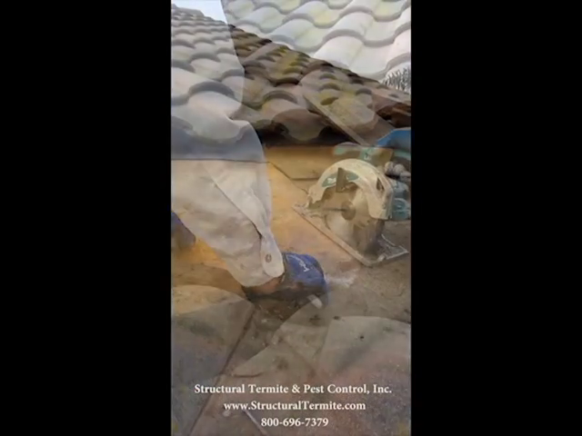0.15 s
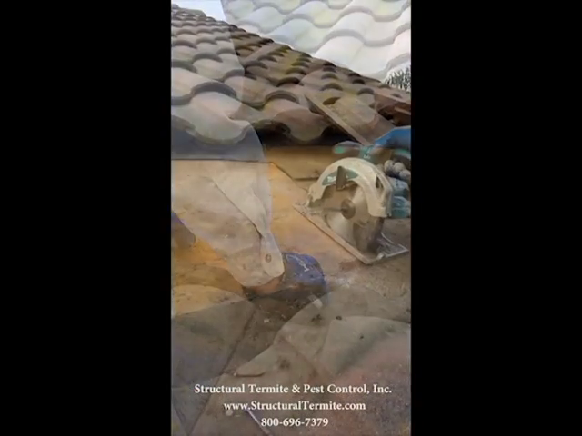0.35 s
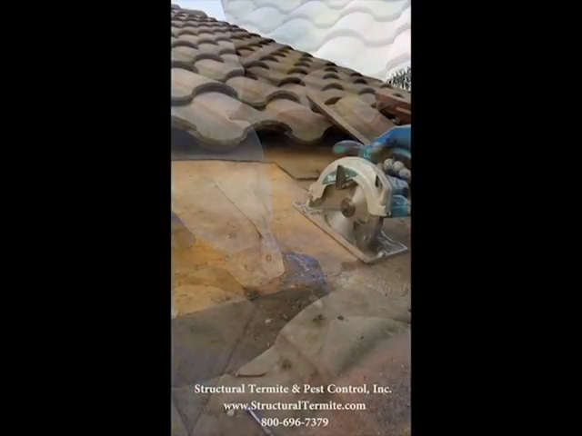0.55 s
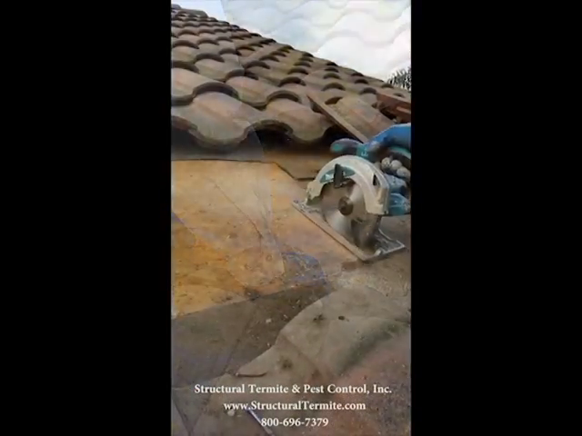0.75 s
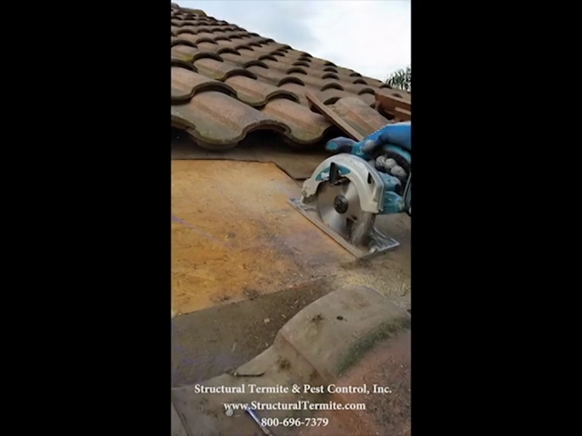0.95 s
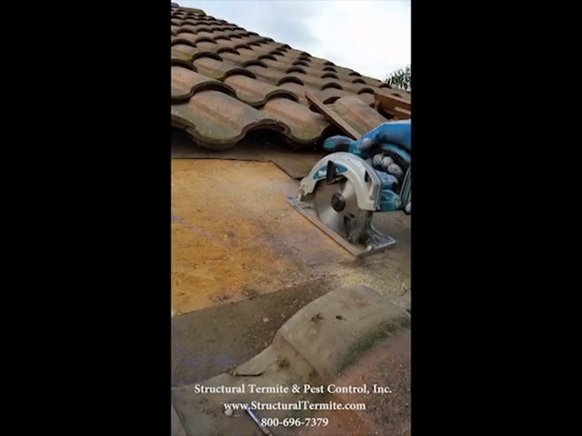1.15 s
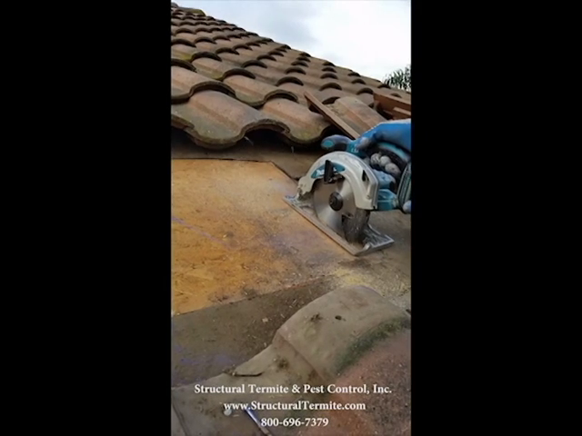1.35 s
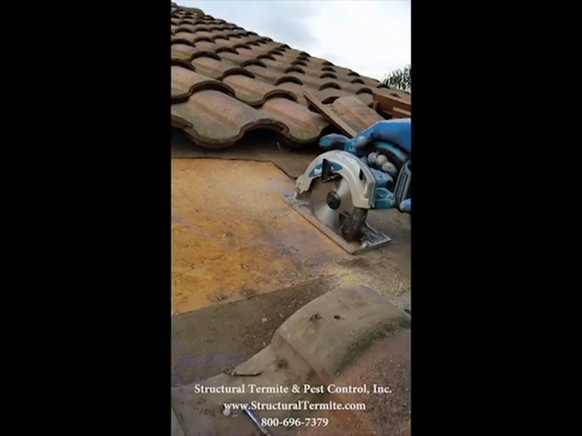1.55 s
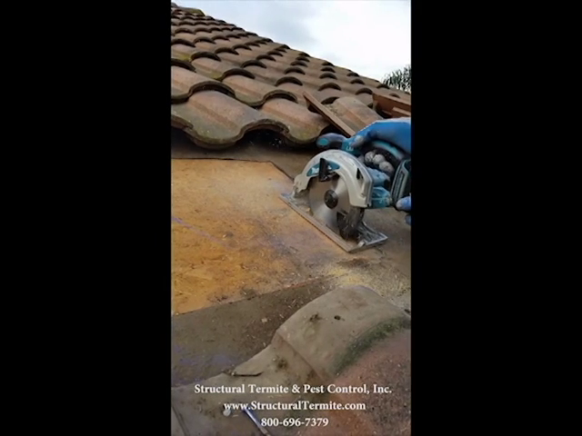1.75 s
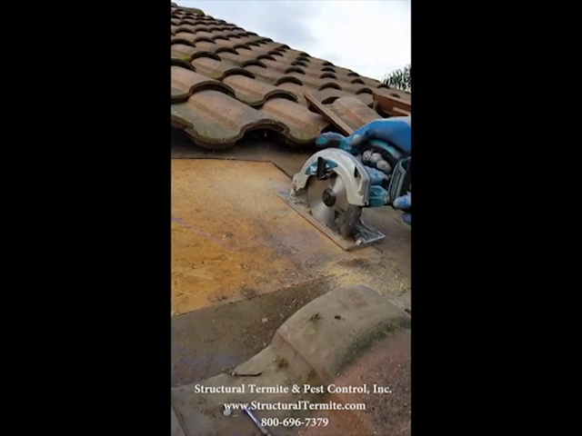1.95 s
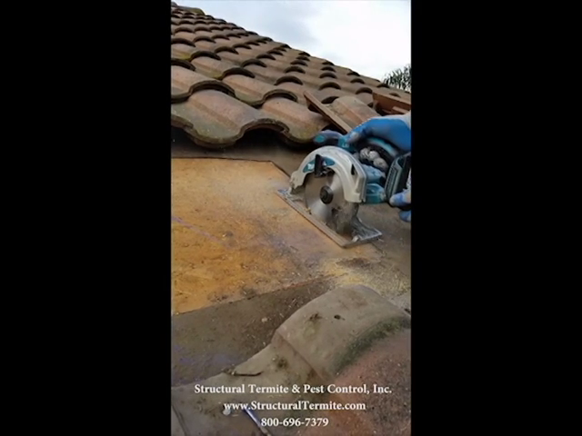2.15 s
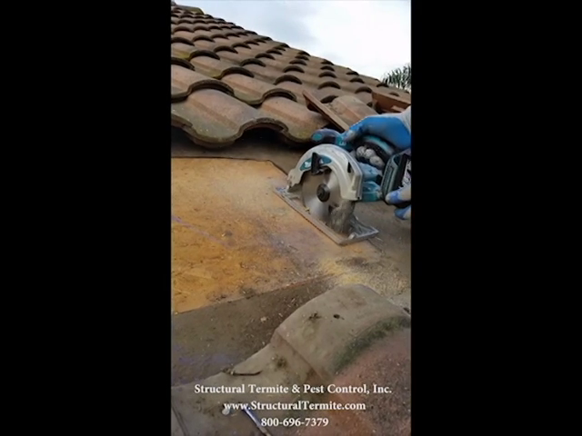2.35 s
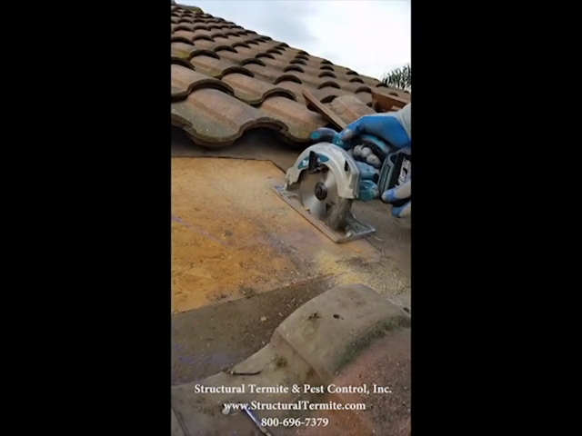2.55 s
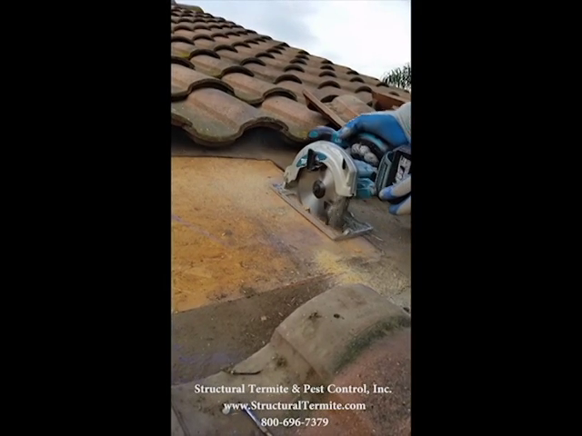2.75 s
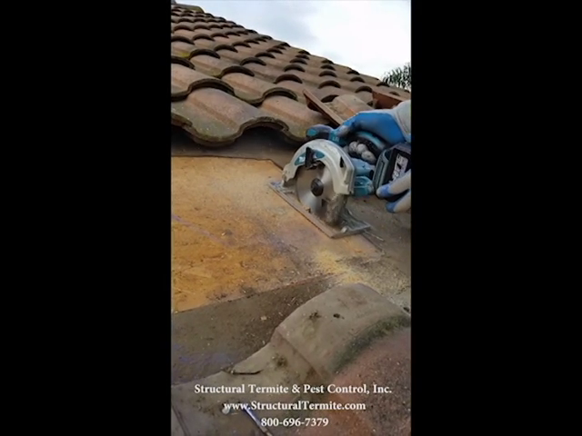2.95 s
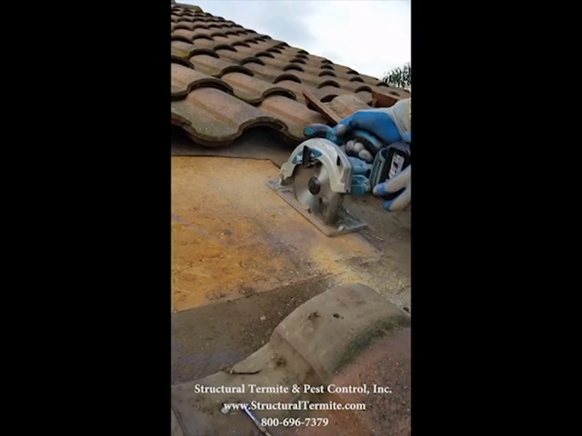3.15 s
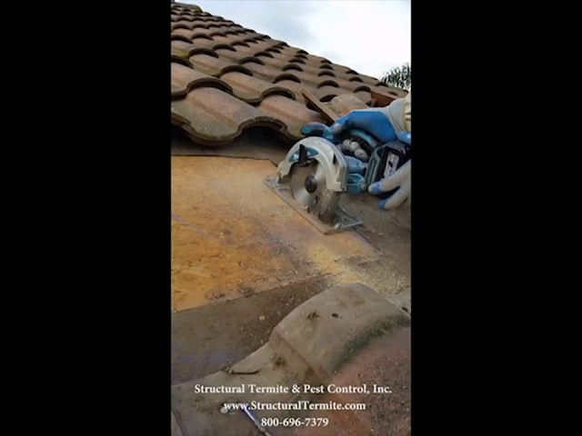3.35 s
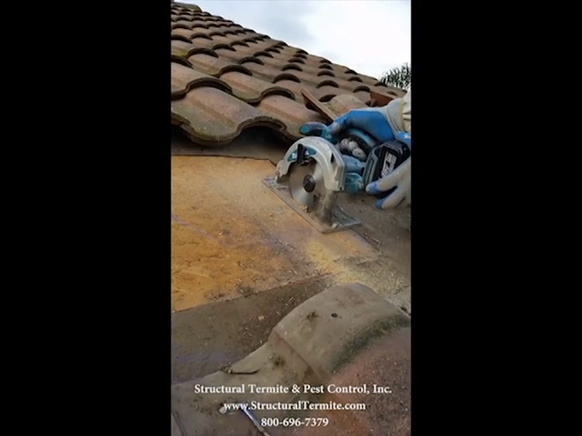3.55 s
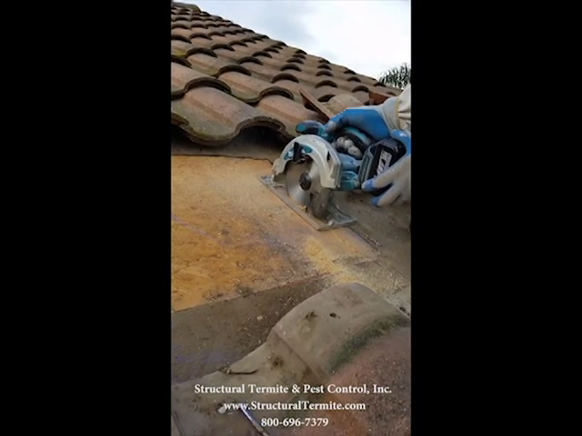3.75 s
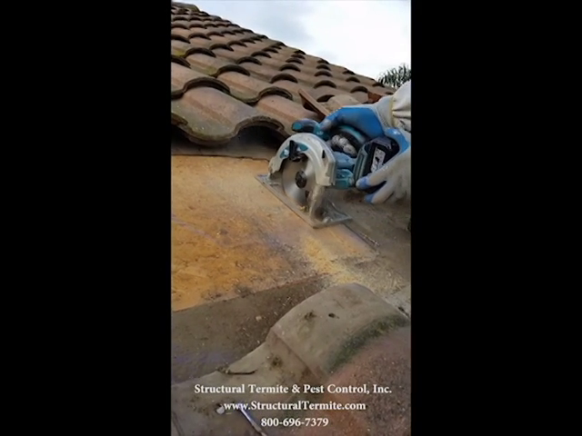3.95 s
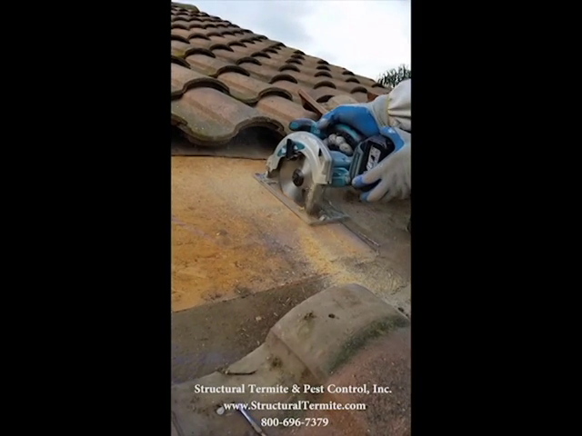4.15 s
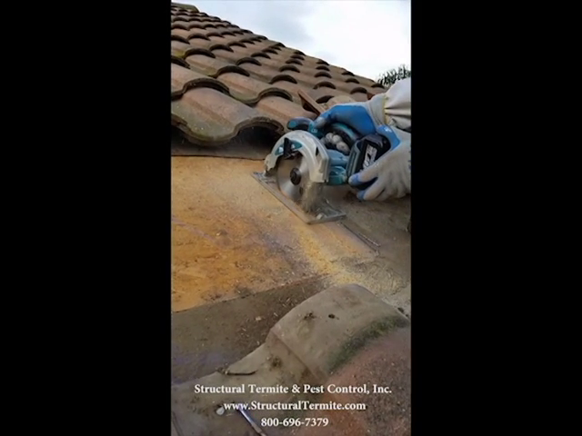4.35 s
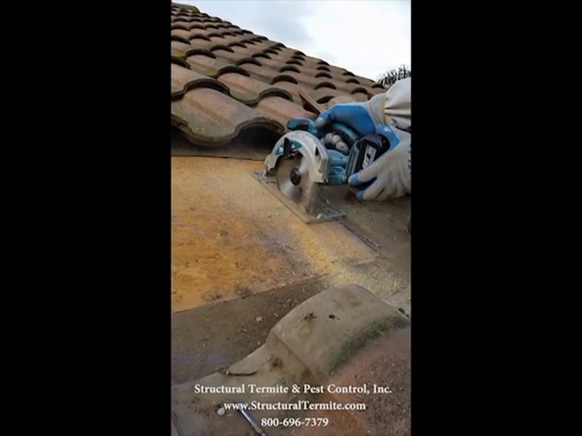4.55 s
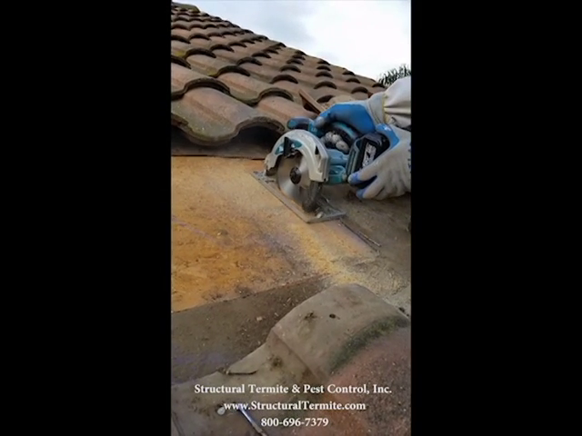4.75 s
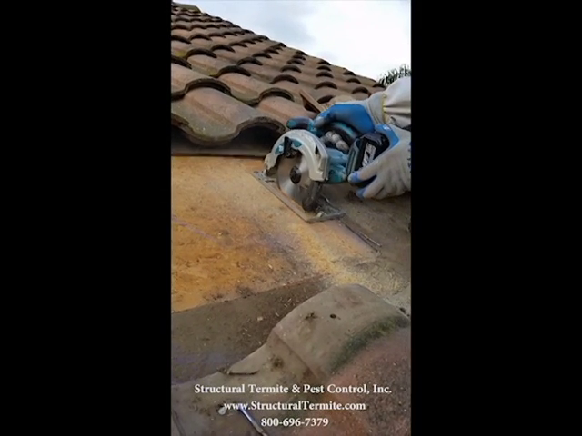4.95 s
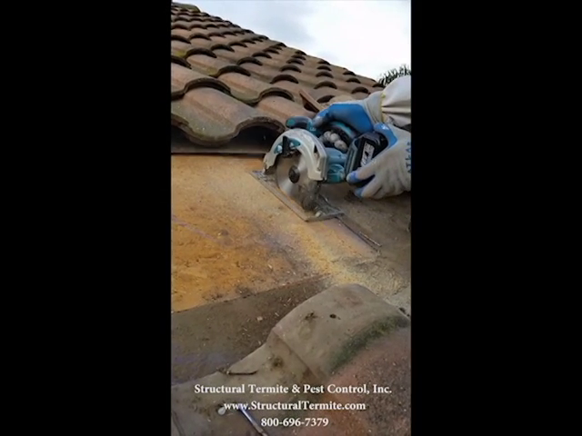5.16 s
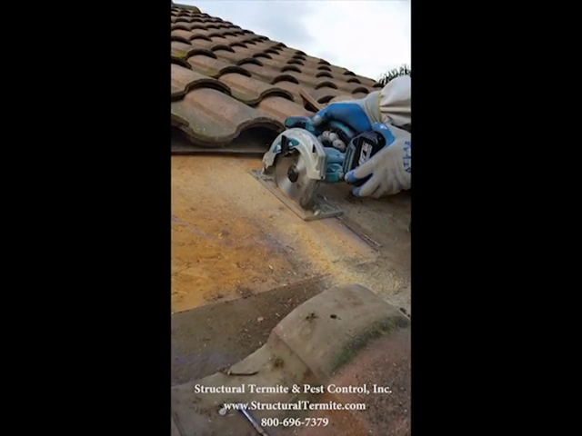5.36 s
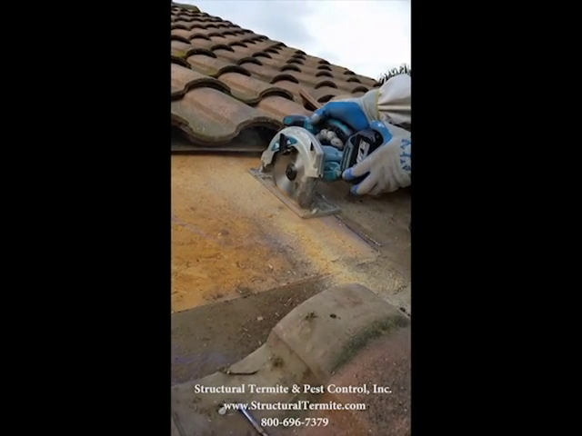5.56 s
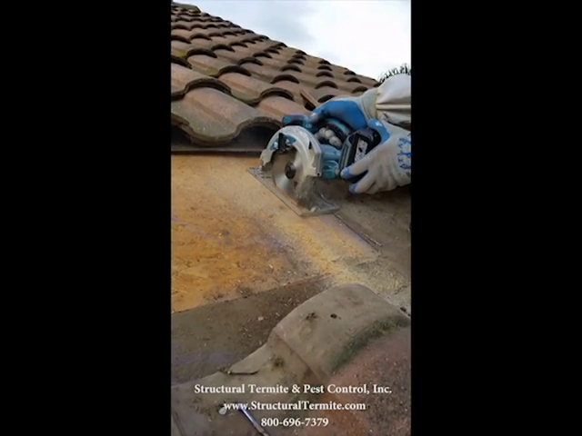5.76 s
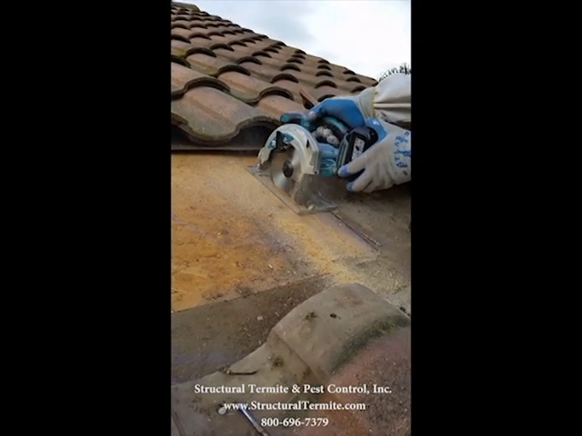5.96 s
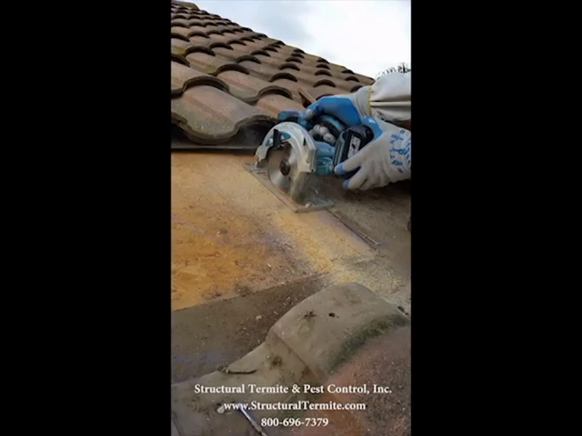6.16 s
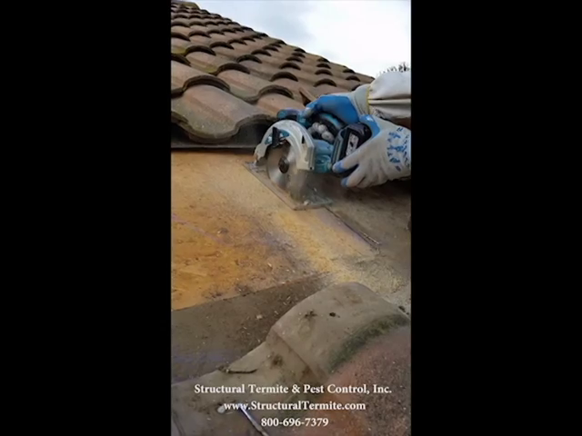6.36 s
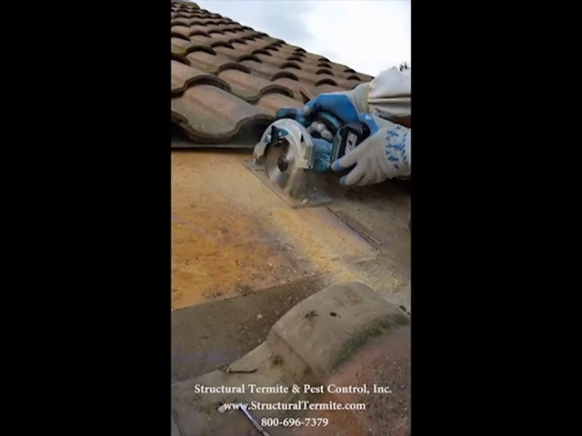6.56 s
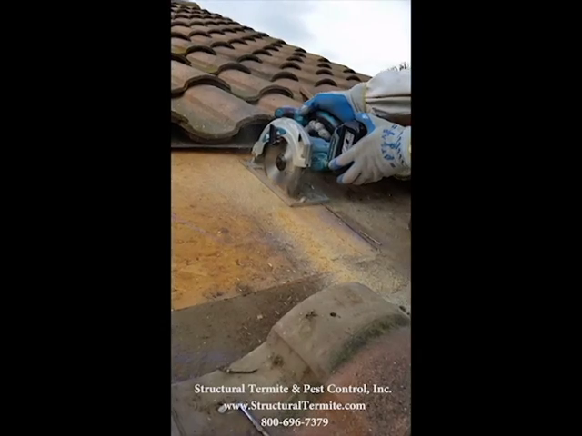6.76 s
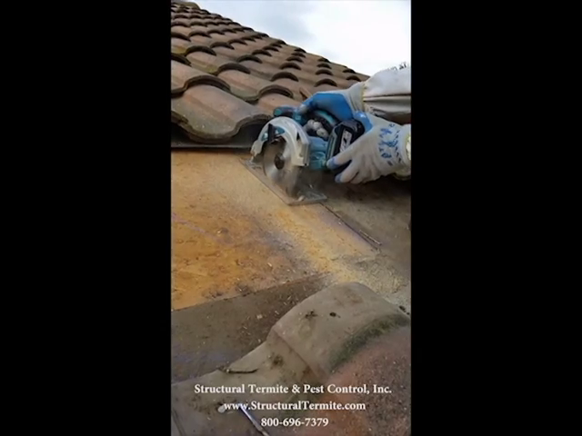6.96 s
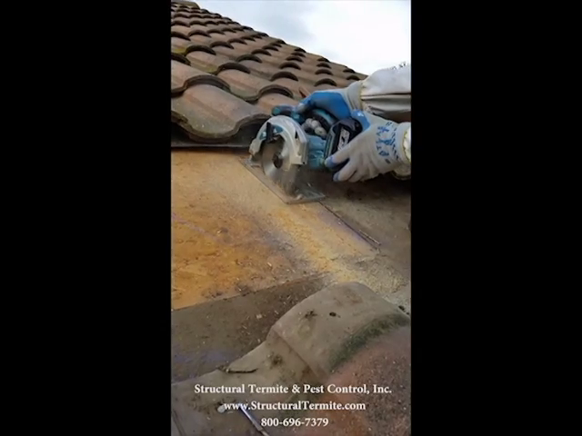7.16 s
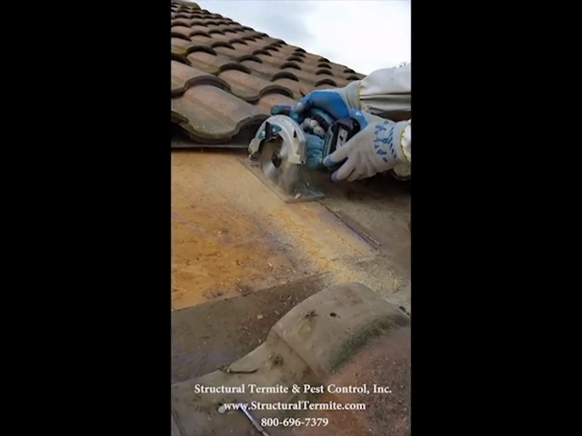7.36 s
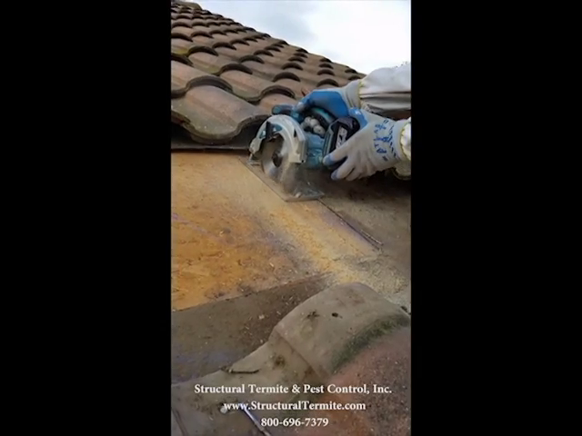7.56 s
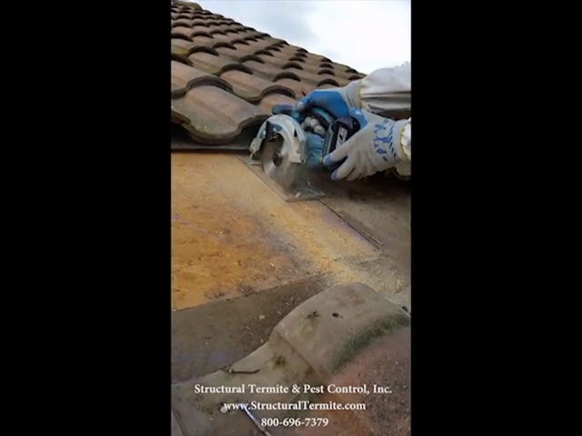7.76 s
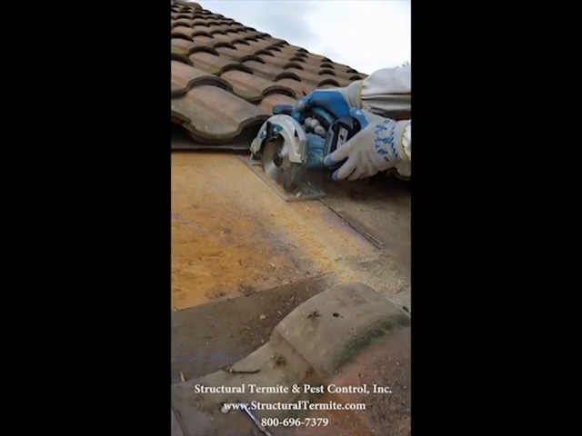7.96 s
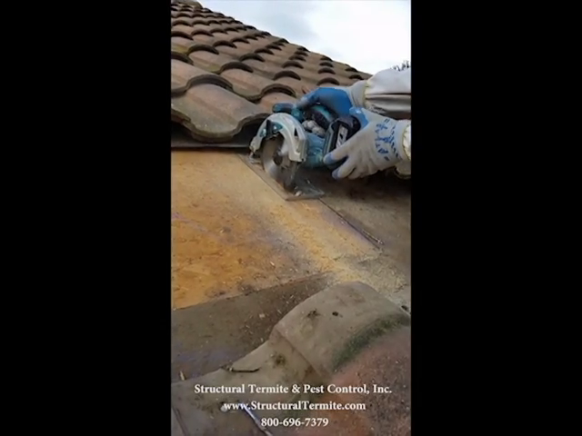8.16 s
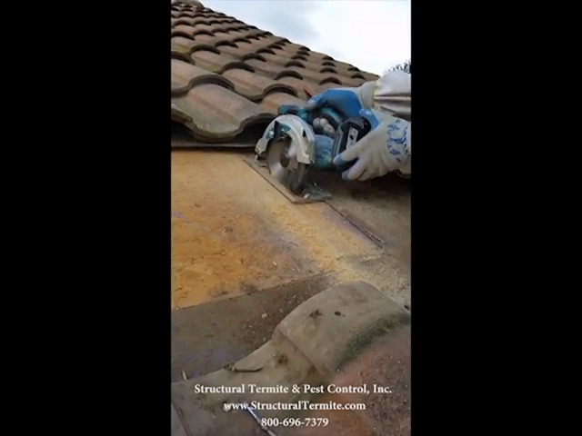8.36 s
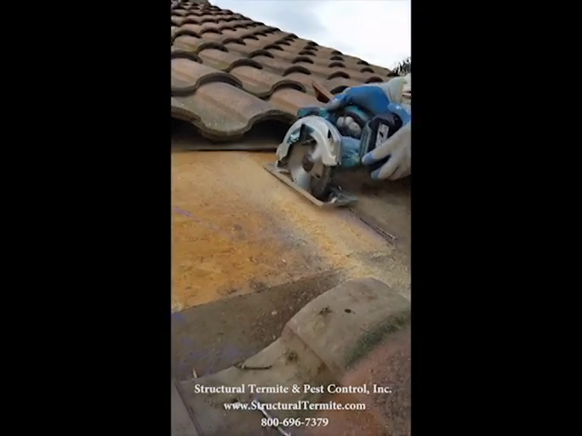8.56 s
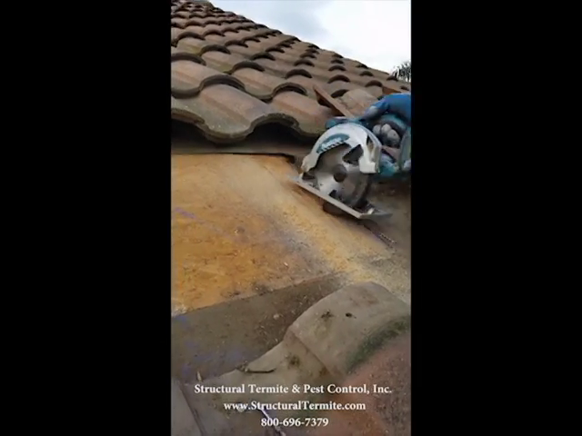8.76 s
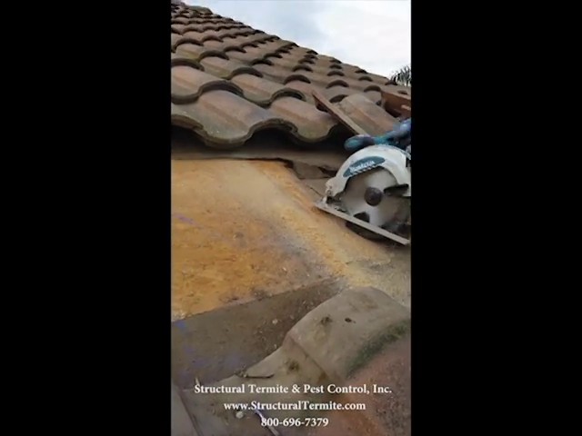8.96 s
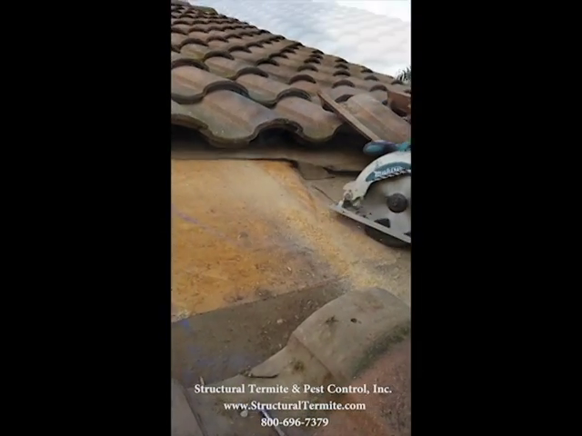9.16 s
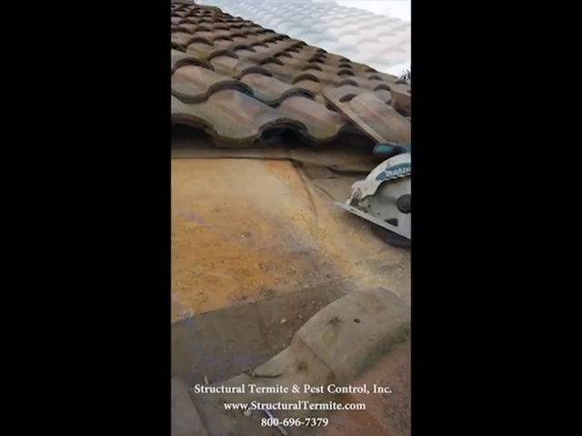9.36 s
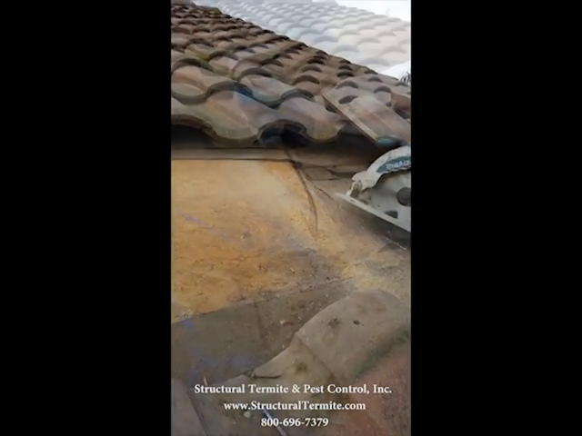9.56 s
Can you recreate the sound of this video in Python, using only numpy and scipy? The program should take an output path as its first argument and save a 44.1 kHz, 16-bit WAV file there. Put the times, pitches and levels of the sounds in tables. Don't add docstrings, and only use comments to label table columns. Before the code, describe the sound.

Outdoors on a roof, close small stereo microphone, treble bright but limited. A tiny scrap of distant traffic and hum lasts to 0.06 s, then silence until about 0.4, when a circular saw rises quickly, slightly right. Its shoe jolts the plywood with low thuds around 0.55-0.6. The motor whine and tooth tones start high, sag by 2 s, dip again at 3.5, recover to a peak near 4.9, then labour lower from 5.6. Dense chip hiss and rasp, brighter in the first two seconds, carry pulsing metallic blade ringing, sheet hum around 4 s and deck rattle with each shove. At 7.95 the saw stops abruptly; the blade rings on for a fraction of a second. Very quiet traffic remains. From 8.3 come light scrapes, ticks and a faint squeak; a clear ping at 8.9 as traffic swells, heavier drags at 9-9.35, the hardest knock at 9.29, and a deep ringing thud at 9.45.

```python
import sys
import numpy as np
from scipy import signal
from scipy.fft import rfft, irfft, next_fast_len
from scipy.io import wavfile
from scipy.ndimage import uniform_filter1d, map_coordinates

SR = 44100
rng = np.random.default_rng(int(sys.argv[2]) if len(sys.argv) > 2 else 0)


def ratio_of_db(decibels):
    return 10 ** (np.asarray(decibels, float) / 20)


def generate_wav(signal):
    frames = np.transpose(np.atleast_2d(signal))
    scaled = np.clip(frames, -1, 1) * 32767
    pcm = np.round(scaled).astype(np.int16)
    wavfile.write(sys.argv[1], SR, pcm)


N = 424241
TIME = np.arange(N) / SR
SLOW = TIME[::32]

# frequency in Hz, likeness from 0 to 1.
SAW_ALIKE = [(100, 1), (300, 0), (640, 0.7), (1250, 0.8), (1900, 0.2), (3000, .45), (7000, 0.3),
             (14000, 0.6)]
# start in seconds, end in seconds, level in dB, traffic swell in dB.
STROKES = [
    (8.295, 8.58, -69, .8),
    (8.58, 8.71, -62, 3),
    (8.78, 8.85, -77, 2),
    (8.99, 9.17, -56.5, 1.8),
    (9.26, 9.36, -59, 1.5),
]
# start s, end s, traffic rumble dB, traffic wash dB, scrape floor dB
OPENING, PAUSE, CLOSING = (0, .06, -35, -39, -61), (7.95, 8.886, -51, -60, -80), (8.886, 9.7, -38, -43, -66)
FREE_TURNS = 68
FADE_IN_S = .382


def unit(x):
    return x / np.sqrt(np.mean(x ** 2) + 1e-20)


def along(points, hz):
    f, v = np.transpose(points)
    return np.interp(np.log(hz + 1), np.log(f + 1), v)


def span(start, end, edge=1e-4):
    return np.clip(np.minimum(TIME - start, end - TIME) / edge + .5, 0, 1)


def wobble(rate):
    knots = rng.standard_normal(int(N * rate / SR) + 4)
    return np.interp(TIME, SLOW, map_coordinates(knots, [SLOW * rate]))


def filtered(x, response):
    m = next_fast_len(x.shape[-1] + SR // 4, True)
    return irfft(rfft(x, m) * response(np.fft.rfftfreq(m, 1 / SR)), m)[..., :x.shape[-1]]


def bumps(modes, hz):
    return ratio_of_db(sum(db / (1 + (2 * (hz - c) / w) ** 2) for c, w, db in modes))


def resonant(modes, hz):
    return np.sqrt(sum(ratio_of_db(2 * db) / (1 + (2 * (hz - c) / w) ** 2) ** 2 for c, w, db in modes))


def rush(gain, alike, patchy_db, count=N):
    z = signal.stft(rng.standard_normal((2, count)), nperseg=512)[2]
    field = uniform_filter1d(rng.standard_normal(z.shape[1:]), size=6, axis=0)
    field = uniform_filter1d(field, size=10, axis=1)
    pair = signal.istft(z * ratio_of_db(patchy_db * unit(field)), nperseg=512)[1][:, :count]

    def mid_side(hz):
        turn = np.arccos(np.clip(along(alike, hz), -1, 1)) / 2
        return gain(hz) * [np.cos(turn), np.sin(turn)]

    mid, side = filtered(pair, mid_side)
    return unit(np.array([mid + side, mid - side]))[:, (N - 1 - np.arange(N)) % count]


def coloured(curve):
    return lambda hz: ratio_of_db(along(curve, hz))


def stretch_levels():
    swell_db = sum(db * span(a, b, .02) for a, b, _, db in STROKES)
    return sum(np.outer(dbs, span(a, b)) for a, b, *dbs in (OPENING, PAUSE, CLOSING)) + swell_db


def traffic(alike, loop):
    # frequency in Hz, density in dB per Hz.
    rumble_colour = [(20, -29), (45, -9), (102, 2.5), (217, -5.5), (269, -12.5), (300, -2.5), (377, -16),
                     (500, -13), (650, -44), (1100, -120)]
    wash_colour = [(210, -26.5), (350, -14.5), (447, -14.5), (505, -10), (1200, -10), (2290, -29),
                   (5000, -44.5), (6500, -63), (11000, -120)]
    # frequency in Hz, level in dB under the rumble.
    hum_lines = [
        (322, -17.5),
        (55, -18.5),
        (367, -21),
    ]
    rumble_db, wash_db, _ = stretch_levels()
    rumble_db = rumble_db - 16 * np.exp(-abs(TIME - CLOSING[0]) / .04) * (TIME > CLOSING[0])
    hum = sum(ratio_of_db(db + 1.5 * wobble(10)) * np.sin(2 * np.pi * hz * TIME) for hz, db in hum_lines)
    rumble = ratio_of_db(2.1 * wobble(22)) * rush(coloured(rumble_colour), alike, count=loop, patchy_db=-1.5)
    wash = rush(coloured(wash_colour), alike, count=loop, patchy_db=-1.0)
    return ratio_of_db(rumble_db - 0.1) * (rumble + hum) + ratio_of_db(wash_db - 3.55) * wash


def shoe_scrape(alike, loop):
    # frequency in Hz, density in dB per Hz.
    light_colour = [(1470, -65.5), (2800, -46), (4790, -25), (8210, -27), (9440, -18), (10300, -7.5),
                    (12500, -24.5), (14600, -21)]
    heavy_colour = [(1470, -28.5), (2500, -2), (2980, -15), (3310, -6.5), (6020, -2), (7570, -5.5),
                    (9940, 3), (14600, -12.5)]
    strokes = sum(ratio_of_db(db) * span(a, b, .02) for a, b, db, _ in STROKES)
    light = rush(coloured(light_colour), alike, count=loop, patchy_db=3.0)
    heavy = rush(coloured(heavy_colour), alike, count=loop, patchy_db=3.0)
    grit = ratio_of_db(2.2 * wobble(70)) * np.where((TIME > 1) & (TIME < CLOSING[0]), light, heavy)
    return (ratio_of_db(stretch_levels()[2]) + strokes) * ratio_of_db(1.5) * grit


def surroundings():
    # frequency in Hz, likeness of the channels from 0 to 1.
    air_alike = [(60, 1), (180, 1), (550, 0.84), (1650, 0.1), (4970, 0.07), (15000, 0.13)]
    loop = 2 * SR
    air = traffic(air_alike, loop) + shoe_scrape(air_alike, loop)
    return air * ratio_of_db([[-.7], [.7]]) * ((TIME < OPENING[1]) | (TIME > PAUSE[0] + .001))


def knocks():
    # time in seconds, tick peak in dB, blade ping and deck thud in dB relative to the tick.
    contacts = [
        (8.305, -56, 5, 5),
        (8.333, -59, -12, 13),
        (8.4386, -53, -16, 1),
        (8.6496, -48, -12, 5),
        (8.831, -61, 0, 9),
        (8.889, -58, 26.5, 4),
        (9.2643, -49, -11, 9),
        (9.2868, -35, -9, 7),
        (9.3203, -48, 5, 15),
        (9.4526, -56, 10, 19),
    ]
    # time in seconds, level in dB.
    drops = [
        (.556, -35),
        (.582, -34),
        (.604, -36),
    ]
    # frequency in Hz, level in dB, 60 dB decay in seconds.
    ping_modes = [(700, -6, 0.047), (850, 1, 0.043), (1010, 2, .04), (1100, 7, 0.055), (1254, 2, 0.17),
                  (1430, -1, 0.067), (1590, -2, 0.049), (1720, -3, 0.08), (1930, -25, .04)]
    thud_modes = [(123.7, 16, 0.02), (195, -8, .05), (300, -8, 0.052)]
    out = np.zeros((2, N + SR))
    t = np.arange(SR // 4) / SR

    def ringing(modes):
        onset = (1 - np.exp(-t / .0005)) ** 2
        return onset * sum(ratio_of_db(db + rng.normal(0, 2) - 60 * t / t60) * np.sin(2 * np.pi * hz * t)
                           for hz, db, t60 in modes)

    for s, db, ping_db, thud_db in contacts:
        tick = ratio_of_db(-2.0 - 60 * t / .03) * uniform_filter1d(rng.standard_normal((2, len(t))), size=2)
        ping = ratio_of_db(ping_db - 4.5) * ringing(ping_modes)
        thud = ratio_of_db(thud_db - 5.5) * ringing(thud_modes)
        out[:, round(s * SR):][:, :len(t)] += ratio_of_db(db) * (tick + ping + thud)
    for s, db in drops:
        out[:, round(s * SR):][:, :len(t)] += ratio_of_db(db) * ringing(thud_modes)
    return out[:, :N] * ratio_of_db([[-.8], [.8]])


def glides():
    # start in seconds, end in seconds, first pitch in Hz, last pitch in Hz, level in dB.
    slides = [
        (5.55, 6.35, 275, 295, -47),
        (3.88, 4.53, 506, 514, -34),
        (8.395, 8.455, 430, 540, -49),
    ]
    out = np.zeros(N)
    for start, end, from_hz, to_hz, db in slides:
        part = np.clip((TIME - start) / (end - start), 0, 1)
        hz = (from_hz + (to_hz - from_hz) * part) * (1 + .006 * wobble(15))
        swell = abs(np.sin(np.pi * part)) ** .3 * (part < 1)
        out += ratio_of_db(db + 1.3 * wobble(25)) * swell * np.sin(2 * np.pi * np.cumsum(hz) / SR)
    return out


def rundown():
    # blade mode in Hz, level in dB, 60 dB decay in seconds.
    left_ringing = [(1240, -49, .4), (2080, -58, .3), (3000, -64, .22), (3700, -61, .45), (4250, -60, .22),
                    (4700, -63, .2), (5300, -62, .2)]
    t = np.clip(TIME - 7.99, 0, None)
    return sum(ratio_of_db(db - 60 * t / t60 + 2.7 * wobble(40)) * np.sin(2 * np.pi * hz * t)
               for hz, db, t60 in left_ringing)


def speed():
    # time in seconds, turns a second in Hz.
    load_curve = [(.55, 75), (.95, 67), (1.4, 68.1), (1.65, 66), (2.05, 58), (2.4, 60.5), (3.2, 56.2),
                  (3.5, 52), (3.9, 58), (4.6, 61), (4.9, 68.6), (5.1, 60), (5.6, 48), (6.6, 47.4),
                  (7.09, 50.6), (7.55, 47.6), (7.73, 51.8), (8.08, 48)]
    inertia_s = .08
    return uniform_filter1d(np.interp(TIME, *np.transpose(load_curve)), size=round(inertia_s * SR))


def level(law):
    free_db, per_turn, fall = law
    rise_s, rise_power, release_s = .22, .9, 7.93
    rise = np.clip((TIME - FADE_IN_S) / rise_s, 1e-6, 1)
    loaded_db = free_db + per_turn * (FREE_TURNS - speed())
    return loaded_db + 20 * rise_power * np.log10(rise) - fall * np.clip(TIME - release_s, 0, None)


def shoves():
    # time in seconds, length in seconds, blade ring in dB, sheet boom in dB, deck rattle in dB.
    pushes = [(.585, .035, 1, 13, 13), (.78, .17, 5.5, 2, 2), (1.8, .08, 5, 1, 8), (2.31, .07, 8, 6, 11),
              (2.7, .09, .8, -6, -2), (2.87, .09, 5, 3, .8), (3.5, .09, 7, 8, 2), (3.82, .07, 6, 6, 4),
              (4.15, .22, .5, 9, -1), (4.48, .04, 7, 4, 14), (4.9, .3, -.8, -4.5, -3.5),
              (5.6, .11, 6, 2, 1), (5.9, .08, -.8, 1, 7), (6.15, .1, 7, -.8, 3), (6.5, .1, -.8, 5, 4),
              (6.72, .14, 6, -1.5, -.8), (7.1, .12, 3.5, -.8, -.8), (7.52, .13, -2.5, 6, -.8),
              (7.72, .07, 8, -6, .8)]
    s, length, *gains = np.transpose(pushes)
    bells = np.exp(-.5 * ((SLOW - s[:, None]) / length[:, None]) ** 2)
    return np.array([np.interp(TIME, SLOW, g) for g in gains @ bells])


def shake():
    # frequency in Hz, width in Hz, level in dB.
    blade_modes = [(1252.5, 48.5, 5), (1182, 83, -5), (1017, 55, -14.5)]
    sheet_modes = [(502, 60, -2.5), (560, 60, -3)]
    # frequency in Hz, density in dB per Hz.
    rattle_colour = [(30, -40), (80, -11), (140, 0.5), (220, -4.5), (300, 1.5), (400, -8.5), (600, -32)]
    buzz_colour = [(400, -29), (620, -7.5), (750, 0), (880, -3), (1020, 1), (1400, -6), (2200, -35.5)]
    ring_law, boom_law, rattle_law, buzz_law = (-32, .17, 260), (-52, .46, 300), (-49.5, .04, 150), (-42.5, -.17, 200)
    push = shoves()
    ring_db, boom_db, rattle_db = push + [level(ring_law), level(boom_law), level(rattle_law)]
    buzz_db = level(buzz_law) + .25 * push[2]
    ring = rush(lambda hz: resonant(blade_modes, hz), [(1000, 0.98)], patchy_db=-1.2)
    ring = ratio_of_db(ring_db + 1.1 + 0.58 * wobble(25)) * ring
    boom = rush(lambda hz: resonant(sheet_modes, hz), [(500, 0.5)], patchy_db=2.2)
    boom = ratio_of_db(boom_db + 1.95 + 0.76 * wobble(22)) * boom
    rattle = ratio_of_db(rattle_db + 3.0) * rush(coloured(rattle_colour), [(100, .5)], patchy_db=3.8)
    buzz = ratio_of_db(buzz_db + 3.5) * rush(coloured(buzz_colour), SAW_ALIKE, patchy_db=4.0)
    return ring + boom + rattle + buzz


def cut(turns):
    # frequency in Hz, density in dB per Hz.
    chip_colour = [(3530, -41.5), (6000, -12.5), (6390, -22.5), (8050, -7), (8290, -10), (10300, 3.5),
                   (11900, -5.5), (13900, -8.5), (14600, -13.5)]
    rasp_colour = [(820, -26), (1400, -5.5), (2850, -7), (3100, -12.5), (3460, -9), (5780, -5.5),
                   (7500, -7), (9750, -35.5), (16500, -120)]
    # frequency in Hz, width in Hz, gain in dB.
    singing_modes = [(1560, 150, 4), (2780, 73, 4), (3338, 200, 4), (3860, 120, 5), (4580, 230, 1.5),
                     (6490, 140, 9), (7080, 130, 5), (7680, 97, 10.5), (7880, 80, 5.5), (8480, 96, 10),
                     (9060, 82, 1), (11020, 120, -1.5), (12350, 130, 3.5), (13600, 170, 3)]
    hiss_law, top_law, rasp_law = (-21.3, .02, 450), (-5, .01, 30), (-26.7, -.04, 310)
    yield_db = -.04 * shoves()[0]
    hiss_db = level(hiss_law) + yield_db + .22 * TIME
    rasp_db = level(rasp_law) + yield_db
    top_db = level(top_law) - level((0, 0, 0)) + 2.3 * span(-9, 2.2, .9)
    bite = ratio_of_db(0.54 * np.sin(2 * np.pi * turns) + 0.46 * wobble(18) + .6 * wobble(60))
    hiss = rush(lambda hz: ratio_of_db(along(chip_colour, hz)) * bumps(singing_modes, hz), SAW_ALIKE, patchy_db=1.14)
    top = filtered(hiss, lambda hz: 1 / (1 + (11500 / (hz + 1)) ** 24))
    hiss = ratio_of_db(hiss_db + 3.5) * (hiss + top * (ratio_of_db(top_db + 5.5) - 1))
    rasp = rush(lambda hz: ratio_of_db(along(rasp_colour, hz)) * bumps(singing_modes, hz), SAW_ALIKE, patchy_db=0.7)
    return bite * (hiss + ratio_of_db(rasp_db + 5.5) * rasp)


def orders(table, turns, drift):
    return sum(ratio_of_db(db + drift * wobble(15)) * np.sin(2 * np.pi * (k * turns + rng.random())) for k, db in table)


def drive(turns):
    # multiple of blade turns, level in dB.
    motor_orders = [(19.5, -15), (26, 0)]
    tooth_orders = [(18, -22), (21, -18), (24, 0)]
    runout_orders = [(9, -12), (11, -8), (12, 0)]
    # frequency in Hz, width in Hz, level in dB.
    whine_body = [(1750, 90, -28), (1550, 50, -29.5), (1255, 70, -31)]
    tooth_body = [(1190, 110, -29), (1400, 150, -47), (1620, 120, -44)]
    runout_body = [(775, 80, -43), (690, 70, -50), (580, 70, -49)]

    def heard(body, table):
        return resonant(body, table[-1][0] * speed())

    whine = ratio_of_db(-2.5 + 1.5 * wobble(5)) * heard(whine_body, motor_orders)
    whine = whine * orders(motor_orders, turns, drift=1.9)
    teeth = ratio_of_db(1.5 * wobble(4)) * heard(tooth_body, tooth_orders)
    teeth = teeth * orders(tooth_orders, turns, drift=4.2)
    pinched_db = -16 * span(3.35, 5.45, .15)
    runout = ratio_of_db(3.1 + pinched_db) * heard(runout_body, runout_orders)
    runout = runout * orders(runout_orders, turns, drift=4.5)
    return ratio_of_db(level((.1, .01, 250))) * (whine + teeth + runout)


def at_microphone(tool):
    # frequency in Hz, left over right in dB.
    balance = [(60, 2), (150, -4), (380, -2), (950, -5), (2380, -1), (5980, -3.5), (15000, -10)]
    # frequency in Hz, phase by which the left leads in radians.
    lead = [(0, 3.5), (1720, 0.18), (2240, 1.84), (2930, 6), (7490, 9.5), (8530, 12), (8960, 10.5),
            (9650, 16.5), (10500, 21.5), (10900, 18.5), (11600, 20), (12100, 23.5), (13400, 15),
            (15400, 8.5)]
    # frequency in Hz, width in Hz, gain in dB.
    dips_left = [(1984, 170, -11), (2393, 210, -13), (3210, 180, -9), (4115, 440, -7), (5046, 560, -13.5),
                 (5950, 560, -8.5), (7230, 600, -8), (13000, 1100, 4)]
    dips_right = [(2690, 168, -16), (3400, 340, 1.5), (3990, 270, -5), (5865, 330, -6.5), (7920, 720, -7)]
    # frequency in Hz, width in Hz, left in dB, right in dB.
    first_half = [(6430, 200, 2.5, 2.5), (8050, 450, -5, -3), (9300, 900, 1.5, 1.5),
                  (12300, 1500, 1.2, 1.2)]
    second_half = [(5300, 500, -5, -1.2), (5850, 500, -6, -3), (9000, 900, -1.5, -2.5)]
    side = np.array([[1], [-1]])

    def place(hz):
        pan = ratio_of_db(side * along(balance, hz) / 2) * np.exp(side * .5j * along(lead, hz))
        return pan * [bumps(dips_left, hz), bumps(dips_right, hz)]

    def shade(rows, hz):
        return [bumps([(c, w, db[k]) for c, w, *db in rows], hz) for k in range(2)]

    early = filtered(tool, lambda hz: place(hz) * shade(first_half, hz))
    late = filtered(tool, lambda hz: place(hz) * shade(second_half, hz))
    moved = np.interp(TIME, (3.3, 4.1), [0, 1])
    return (1 - moved) * early + moved * late


def saw():
    hunting = .0004 * (FREE_TURNS + 5 - speed()) * wobble(5)
    turns = np.cumsum(speed() * (1 + .002 * wobble(30) + hunting)) / SR
    tool = drive(turns) + cut(turns) + shake()
    return at_microphone(tool * (TIME > FADE_IN_S))


def scene():
    return surroundings() + knocks() + glides() + rundown() + saw()


def starved(x):
    # frequency in Hz, threshold in dB relative to the typical line.
    masked = [(50, -11.5), (300, -11), (900, -9), (2000, -6.5), (5500, -5), (6500, -6), (8000, -6.5),
              (9000, -9), (14000, -9)]
    hz, _, z = signal.stft(x, SR, window="cosine", nperseg=2048)
    power = abs(z) ** 2
    steady = uniform_filter1d(power[:, hz < 14000], size=9, axis=1)
    typical = np.median(steady, axis=1, keepdims=True)
    keep = uniform_filter1d(power, size=4, axis=1) > typical * ratio_of_db(2 * along(masked, hz))[:, None]
    return signal.istft(z * keep, SR, window="cosine", nperseg=2048)[1][:, :N]


def top_cut(x):
    return signal.sosfilt(signal.butter(12, 15820, fs=SR, output="sos"), x)


def record(dry):
    held = dry / (1 + abs(dry / .95) ** 4) ** (1 / 4)
    narrow = filtered(starved(held), lambda hz: np.clip((14640 - hz) / 120, 0, 1) ** 2)
    return top_cut(narrow)


dry = scene()
out = record(dry)
generate_wav(out)
```